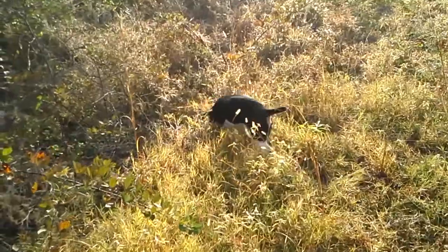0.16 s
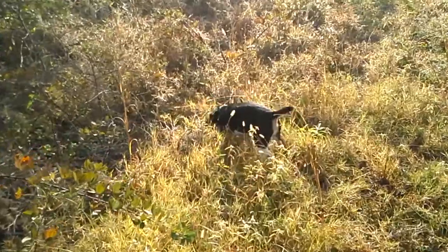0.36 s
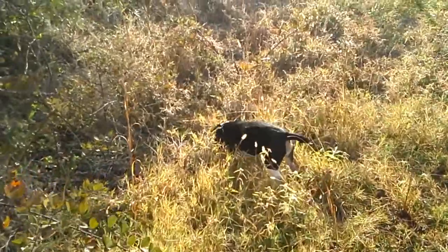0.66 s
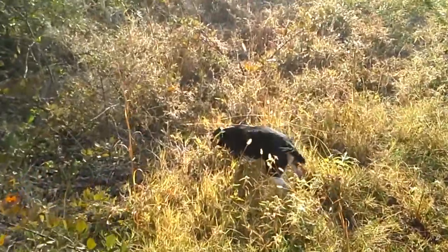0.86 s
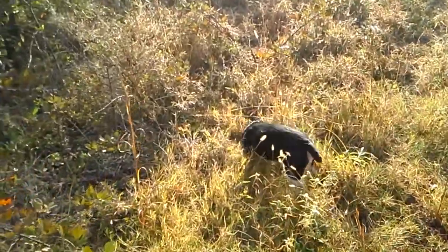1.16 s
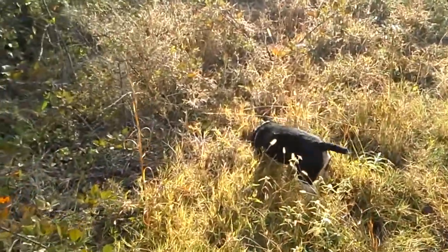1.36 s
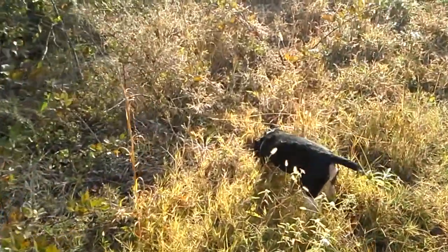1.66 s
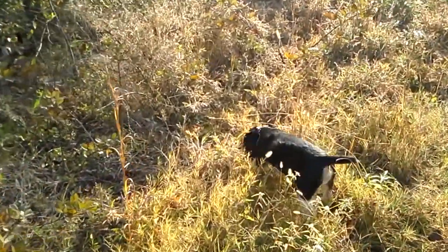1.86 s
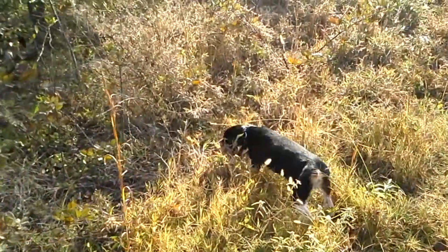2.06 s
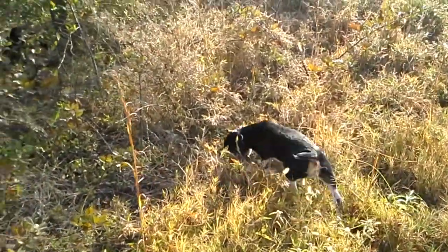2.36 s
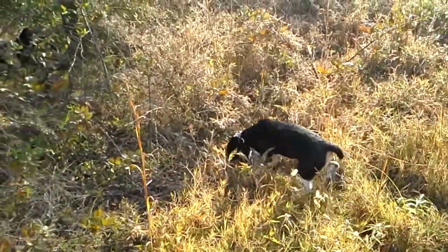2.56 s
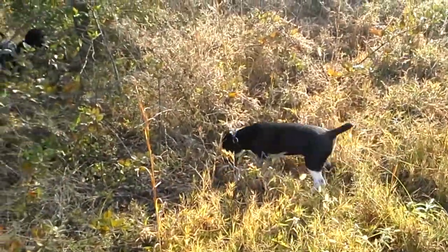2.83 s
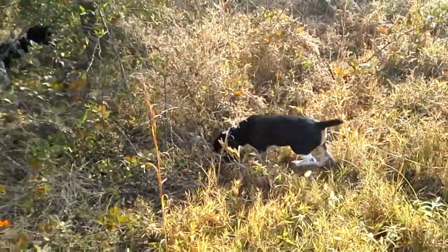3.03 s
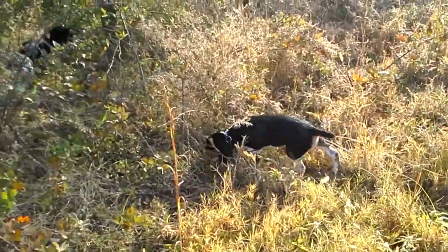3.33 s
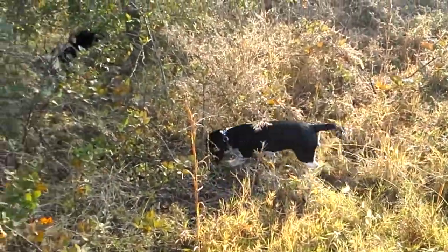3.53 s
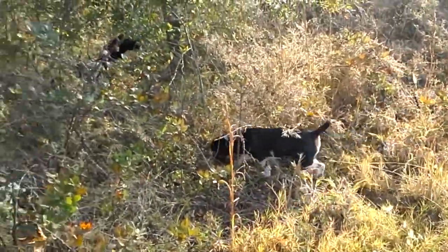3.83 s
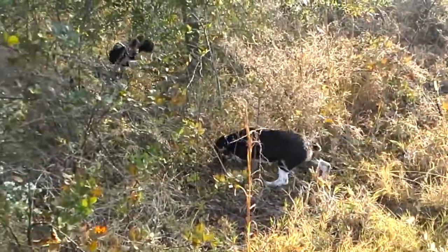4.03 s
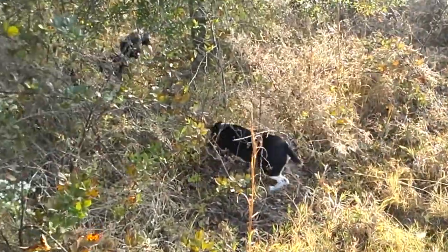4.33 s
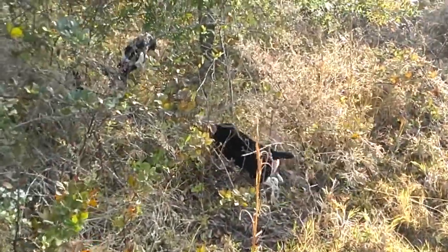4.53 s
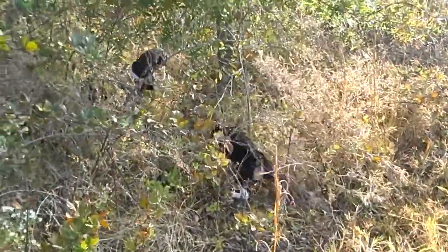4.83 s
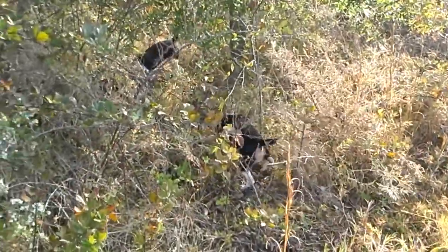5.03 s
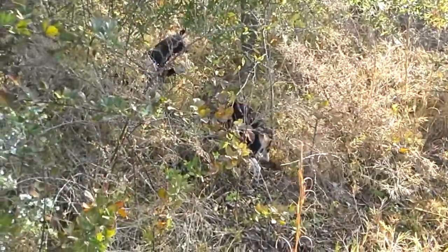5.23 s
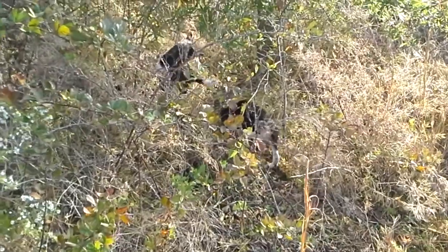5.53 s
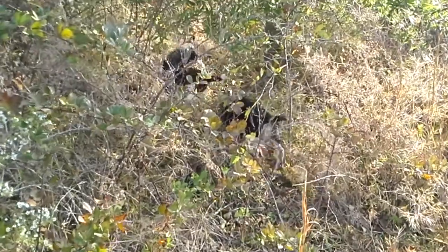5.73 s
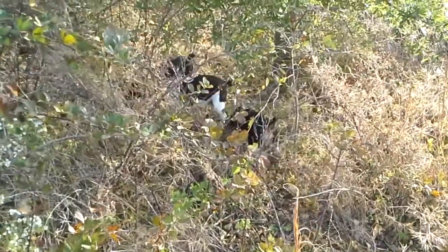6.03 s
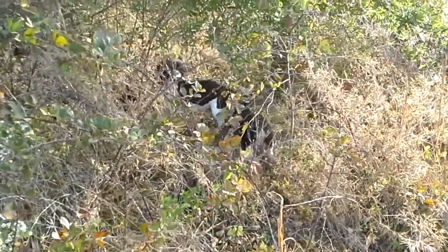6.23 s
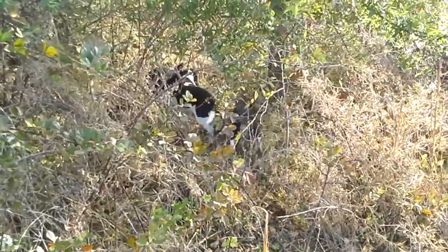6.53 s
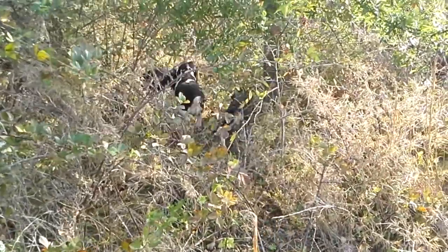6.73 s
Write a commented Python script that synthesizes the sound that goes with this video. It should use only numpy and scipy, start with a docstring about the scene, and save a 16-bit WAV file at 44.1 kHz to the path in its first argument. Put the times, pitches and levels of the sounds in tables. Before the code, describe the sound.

A rough, raspy bay repeats while a second dog answers with short high yelps; dry brush crackles, collar tags clink, trees echo faintly.

```python
"""One hound bays hoarsely: fold pulses turn rough, a steadier second tone chops them, and resonances ring.
Another hound yelps in high arching calls, sums of harmonics that crack into doubled periods or noisy barks.
Brush rustles, crackles and snaps as filtered noise; collar tags ring as decaying sines.
Low lumpy noise makes a gust, puffs on the microphone and one thump under a loud yelp as the input lurches.
Trees echo the calls and the input flattens the loudest peaks."""
import sys
import numpy as np
from scipy import signal
from scipy.fft import rfft, irfft, next_fast_len
from scipy.io import wavfile
from scipy.ndimage import uniform_filter1d, map_coordinates

SR = 44100
rng = np.random.default_rng(int(sys.argv[2]) if len(sys.argv) > 2 else 0)


def wav_out(sig):
    """Save sig, one row per channel (or a flat mono array), as 16-bit PCM at SR to the path in sys.argv[1]."""
    wavfile.write(sys.argv[1], SR, np.round(np.clip(np.atleast_2d(sig).T, -1, 1) * 32767).astype(np.int16))


N = 303835
TIME = np.arange(N) / SR
ONSET_POWER = 0.95  # shapes the soft start of the folds
CRACK_S = 0.006  # time a register crack takes


def amp(db):
    """Amplitude of a level in dB."""
    return 10 ** (np.asarray(db) / 20)


def unit(x):
    """x at rms 1."""
    return x / np.sqrt(np.mean(x ** 2) + 1e-20)


def even(x, size=900):
    """x held near rms 1 from moment to moment; size in samples."""
    power = uniform_filter1d(uniform_filter1d(x * x, size), size // 2)
    return x / np.sqrt(np.abs(power) + 1e-12)


def along(points, hz):
    """(Hz, value) points interpolated on a log frequency axis."""
    f, v = np.transpose(points)
    return np.interp(np.log(hz + 1), np.log(f + 1), v)


def wobble(n, rate):
    """A smooth random curve, rate knots a second."""
    knots = rng.standard_normal(8192)
    return map_coordinates(knots, [np.arange(n) * rate / SR], mode="wrap")


def filtered(x, response):
    """x times a complex response of frequency."""
    m = next_fast_len(len(x) + 4096)
    return irfft(rfft(x, m) * response(np.fft.rfftfreq(m, 1 / SR)), m)[:len(x)]


def resonance(f, hz, width):
    """A steep causal resonance: one pole pair applied twice."""
    return (1j * f * width / (hz * hz - f * f + 1j * f * width)) ** 2


def noise(spectrum):
    """Coloured noise of rms 1."""
    return unit(filtered(rng.standard_normal(N), lambda f: amp(along(spectrum, f))))


def cycles(hz):
    """Phase of an oscillator."""
    return 2 * np.pi * np.cumsum(hz) / SR


def span(start, length):
    """The samples of a call and the time since its start."""
    at = np.flatnonzero((TIME >= start) & (TIME <= start + length))
    return at, TIME[at] - start


def ramp(t, length):
    """A smooth step from 0 to 1 that takes length seconds."""
    return np.sin(np.pi / 2 * np.clip(t / length, 0, 1)) ** 2


def passband(f, notch_hz=950, notch_depth=0.057, notch_width_hz=110, top_hz=2850):
    """The throat passes a steep-sided band, with an antiresonance above its lowest peak."""
    notch = 1 - notch_depth / (1 + ((f - notch_hz) / notch_width_hz) ** 2)
    return notch / (1 + (f / top_hz) ** 24) / (1 + (430 / (f + 1)) ** 8)


def sliding(source, stretch, response, count=7):
    """Resonances that slide by the factor stretch: a cross-fade between fixed shapes, held at rms 1."""
    sizes = np.linspace(stretch.min() * .99, stretch.max() * 1.01, count)
    total = 0
    for size, share in zip(sizes, np.eye(count)):
        ring = filtered(source, lambda f: response(f / size))
        total = total + np.interp(stretch, sizes, share) * ring
    return even(total)


def bay(beat, trim_db=-1.5, jitter=.072, shimmer=0.63, coupling=0.674, muzzle_db=-17,
        jaw_rise=0.058, jaw_waver=0.036, flutter_db=3.0, count=18):
    """Fold pulses turn chaotic, are chopped by the second tone and ring the throat's resonances."""
    # bays: start_s, length_s, attack_s, release_s, level_db (before trim), push_db, first_hz, top_hz (before sag),
    # clean_s, roughness (clipped to 1), throat_db, mouth_db, lips_db, rasp_db (relative), widest_after_s,
    # main_resonance_wide_hz, main_resonance_end_hz
    bay_calls = [(0.455, 0.057, 0.015, 0.0096, -32.5, 1, 568.5, 574, .040, .3, -2, -4, -18, -2, .02, 1750, 1750),
                 (0.484, .160, 0.048, .035, -11.5, 12.5, 569.6, 667.3, 0.0055, 1, -13, -15, -10.5, -3.5, 0.079, 1780, 1750),
                 (0.785, 0.41, 0.04, 0.057, -12.5, 12, 564.6, 688.6, 0.028, 0.9, -6.5, -6, -15, -1.5, 0.04, 1850, 1674),
                 (1.504, 0.25, 0.022, 0.12, -8.5, 1.5, 575, 641.7, 0.012, 1.08, -4.5, -2.5, -17, -7.5, 0.075, 1964, 1940),
                 (2.019, .494, 0.022, 0.045, -11, 4.5, 642.8, 703, .001, .9, -8.5, -5.5, -14, 3.5, .13, 2190, 1750),
                 (2.692, 0.44, 0.014, 0.064, -10, 8.5, 566, 629.6, 0.011, 1.01, -13.5, -6, -27, -1, 0.026, 1920, 1730),
                 (3.274, 0.407, 0.02, 0.024, -10.5, 10.5, 515.4, 607.5, 0.0238, 0.89, -11.5, -2, -13.5, 2, 0.041, 1850, 1628),
                 (3.848, 0.18, 0.055, 0.061, -7.5, 5.5, 506.5, 559.8, 0.047, 0.9, -14, -10, -31, 1, 0.086, 1654, 1610),
                 (4.91, 0.17, 0.032, 0.062, -9, 7, 549, 653, 0.0019, 1.07, -10, -14, -14, -2, 0.046, 1820, 1740),
                 (5.389, .357, 0.02, 0.041, -11, 6, 561.4, 683.3, 0.017, 1.05, -9.5, -11, -7, -2.5, 0.12, 1970, 1830),
                 (6.742, 0.15, 0.046, 0.12, -23.5, -9, 502, 549, 0.0613, 0.36, 13, 26, -3, -3, 0.045, 1730, 1600)]
    # muzzle resonances: center_hz (before sliding), width_hz, relative_db
    muzzle_modes = [(3340, 180, -7), (5020, 420, -2), (5810, 106, 8), (6396, 200, 4), (7580, 375, 0.5),
                    (8750, 1400, -15.5)]
    # throat resonances: center_hz, width_hz
    throat_mode, mouth_mode, main_mode, lips_mode = (651.5, 240), (1305, 344), (1980, 372), (2423, 290)
    push_at_s, push_fade_s = 0.051, 0.042
    squeeze_db, squeeze_lead_s, squeeze_half_s = 1, 0.12, 0.022  # last squeeze of air, lead counted from the end
    pitch_rise_s, pitch_sag_s, pitch_sag = .055, .09, .11  # sag is a share of the pitch
    breakup_s, clean_rough = 0.0206, 0.053
    jaw_swing, jaw_close_s = 0.051, 0.1  # main resonance starts this share low
    shut_s, shut_throat_db = 0.029, 17.5  # a nearly shut muzzle favours the throat
    clean_mouth_db, mouth_db_per_hz = -21, 0.0066  # a clean voice hardly rings the mouth
    pitch_wander, jaw_wander = .02, 0.035

    def muzzle(f):
        return sum(amp(d) * resonance(f, c, w) for c, w, d in muzzle_modes)

    out = np.zeros(N)
    for (start, length, attack, release, db, push_db, first_hz, top_hz, clean_s, hoarse,
         throat_db, mouth_db, lips_db, rasp_db, widest_s, wide_hz, closed_hz) in bay_calls:
        at, t = span(start, length)
        n, left = len(at), length - t

        push = ramp(t, push_at_s) * np.exp(-np.maximum(t - push_at_s, 0) / push_fade_s)
        squeeze = np.exp(-((left - squeeze_lead_s) / squeeze_half_s) ** 2) * (1 - push)
        force = ramp(t, attack) ** ONSET_POWER * ramp(left, release)
        force = force * amp(db + trim_db + push_db * push + squeeze_db * squeeze)

        hz = top_hz + (first_hz - top_hz) * np.exp(-(t / pitch_rise_s) ** 2)
        hz = hz * (1 - pitch_sag * np.exp(-left / pitch_sag_s))
        broken = ramp(t - clean_s, breakup_s)
        rough = np.clip(clean_rough + (hoarse - clean_rough) * broken, 0, 1)

        jaw_hz = wide_hz + (closed_hz - wide_hz) * ramp(t - widest_s, jaw_close_s)
        jaw_hz = jaw_hz * (1 - jaw_swing * (1 - ramp(t, widest_s)))
        shut = np.exp(-np.minimum(t, left) / shut_s)
        mouth_db = mouth_db + mouth_db_per_hz * (jaw_hz - closed_hz) * broken + clean_mouth_db * (1 - broken)

        unsteady = 1 + jitter * rough * wobble(n, 420) + pitch_wander * rough * wobble(n, 17)
        phase = cycles(hz * unsteady)
        pulses = unit(sum(np.cos(k * phase) for k in range(1, count)))
        pulses = pulses * (1 + shimmer * rough * wobble(n, 500))
        turbulence = rough * (1 + np.cos(phase)) * rng.standard_normal(n)
        source = (pulses + turbulence) * (1 + coupling * beat[at])

        low = filtered(source, passband)
        stretch = jaw_hz * (1 + jaw_wander * wobble(n, 15.2)) / main_mode[0]
        voice = sliding(low, stretch, lambda f: resonance(f, *main_mode))
        throat_db = throat_db + shut_throat_db * shut
        for mode, mode_db in ((throat_mode, throat_db), (mouth_mode, mouth_db), (lips_mode, lips_db)):
            # chaos shifts energy between the resonances
            level = amp(mode_db + flutter_db * rough * wobble(n, 43.2))
            voice = voice + level * even(filtered(low, lambda f: resonance(f, *mode)))

        rasp = sliding(source, 1 + jaw_rise * t / length + jaw_waver * wobble(n, 22.28), muzzle)
        rasp_level = amp(muzzle_db + rasp_db + flutter_db * wobble(n, 31.4))
        out[at] += force * (even(voice, size=400) + rasp_level * rasp)
    return out


def drone(jitter=0.01, wander=.02, shimmer_db=2, swell_db=1.5, fade_s=0.021, lead_rad=2.31):
    """The second tone of the long bays, an arch of pitch: its sound, and its beat that modulates the folds."""
    # second tones: start_s, length_s, end_hz, middle_hz, first_level_db, last_level_db
    drone_calls = [(0.843, .31, 434.2, 468.6, -13, -24.5), (2.059, .42, 429, 437.8, -19.5, -15),
                   (2.734, 0.34, 431.8, 439.3, -18, -18.5), (3.327, .345, 429.9, 430, -19, -21),
                   (5.456, 0.23, 428.2, 437.8, -21.5, -15)]
    # harmonics 1 to 6: relative_db
    drone_harmonics = [-21.5, -11.5, -2, 0, -7.5, -35]
    sound, beat = np.zeros(N), np.zeros(N)
    for start, length, end_hz, mid_hz, first_db, last_db in drone_calls:
        at, t = span(start, length)
        n = len(at)
        db = first_db + (last_db - first_db) * t / length
        fade = ramp(t, fade_s) * ramp(length - t, fade_s)
        hz = end_hz + (mid_hz - end_hz) * np.sin(np.pi * t / length) ** 2
        phase = cycles(hz * (1 + wander * wobble(n, 20) + jitter * wobble(n, 153.6)))
        tone = np.zeros(n)
        for k, harmonic_db in enumerate(drone_harmonics, 1):
            tone += amp(harmonic_db + shimmer_db * wobble(n, 49.0)) * np.cos(k * phase)
        sound[at] = np.sqrt(2) * fade * amp(db + swell_db * wobble(n, 17.3)) * tone
        beat[at] = fade * np.cos(phase + lead_rad)  # the folds lead by the throat's delay
    return sound, beat


def yelp(jitter=0.08, tremor=0.0045, doubling_db=-2, drop_rough=0.22, drop_doubling=0.53, count=22):
    """A nearly pure tone that glides, holds and drops; pushed hard, it cracks an octave down or into a bark."""
    # yelps: start_s, length_s, attack_s, level_db, overtones_db, first_hz, top_after_s, top_hz,
    # before_drop_hz, last_hz (pitches before the crack factor)
    yelp_calls = [(0.197, .140, 0.041, -8, -11.5, 711, 0.045, 836, 799, 690),
                  (1.154, 0.13, 0.044, -9, -8, 1308, 0.049, 1502, 1486, 890),
                  (1.589, 0.11, 0.016, -10.5, -8, 1424, 0.027, 1489, 1504, 1130),
                  (1.892, 0.13, 0.013, -5, -3.5, 1082, 0.015, 939, 851, 760),
                  (4.25, 0.13, 0.064, -11.5, -7.5, 1096, 0.073, 1404, 1327, 1100),
                  (4.6, .124, 0.043, -10, -3, 1146, 0.067, 1470, 1454, 665),
                  (5.085, 0.043, 0.033, -20.5, -9.5, 1560, 0.0177, 1550, 1550, 1420),
                  (5.111, 0.15, 0.018, -8, -11.5, 1187, 0.0356, 1166, 1148, 890),
                  (5.907, 0.068, 0.037, -11.5, -3, 733, 0.037, 774, 772.5, 646),
                  (6.473, 0.1, 0.052, -8, -5, 1123, 0.056, 1504, 1492, 757)]
    # throat colour: freq_hz, relative_db
    yelp_colour = [(200, -29), (450, -34), (720, 9.5), (1000, 9), (1400, 0.5), (2000, 3), (2500, -4),
                   (3000, -4), (3600, -7), (4500, -27.5), (7500, -15.5), (11000, -33.5), (16000, -45.5)]
    # resonance that the open mouth adds: center_hz, half_width_hz
    open_hz, open_width_hz = (1820, 550)
    drop_s, release_s, sag_db_per_s = .03, 0.031, 45
    out = np.zeros(N)
    for start, length, attack, db, slope_db, first_hz, top_s, top_hz, late_hz, last_hz in yelp_calls:
        at, t = span(start, length)
        n = len(at)
        factor, doubling, rough, crack_db, mouth_db = register(start, t)
        climb = np.sin(np.pi / 2 * np.clip(t / top_s, 0, 1))
        hold = ramp(t - top_s, max(length - drop_s - top_s, CRACK_S))
        drop = np.clip(1 - (length - t) / drop_s, 0, 1) ** 1.4
        hz = first_hz + (top_hz - first_hz) * climb + (late_hz - top_hz) * hold + (last_hz - late_hz) * drop
        force = ramp(t, attack) ** ONSET_POWER * np.sqrt(ramp(length - t, release_s))
        force = force * amp(db + crack_db - sag_db_per_s * (t - attack))

        # the slackening folds lose their grip
        rough = np.clip(rough + drop_rough * drop, 0, 1)
        doubling = doubling + drop_doubling * drop
        hz = factor * hz * (1 + jitter * rough * wobble(n, 478) + tremor * wobble(n, 134.0))
        # slight phase scatter blurs the high overtones but leaves the fundamental sharp
        phase = cycles(hz) + .12 * wobble(n, 700)

        tone = np.zeros(n)
        for half in range(1, count):
            k = half / 2
            # alternating cycles add lines halfway between the harmonics
            size = doubling * amp(doubling_db) if half % 2 else 1
            overtone_db = (slope_db * (1 - rough) + 5.5 * wobble(n, 87)) * (k > 1)
            open_db = mouth_db * np.exp(-((k * hz - open_hz) / open_width_hz) ** 2)
            tone += size * amp(along(yelp_colour, k * hz) + overtone_db + open_db) * np.sin(k * phase)

        breath = (1 + np.cos(phase)) * rng.standard_normal(n)
        bark = unit(filtered(breath, lambda f: resonance(f, 1650, 790) * passband(f)))
        out[at] += force * even(even(tone, size=400) + rough * bark, size=400)
    return out


def register(start, t, clean_rough=0.027):
    """Pitch factor, doubling, roughness, level and mouth dB through a yelp: nearly clean until it cracks."""
    # cracks: start_s, pitch_factor, period_doubling (0-1), roughness (0-1), level_change_db, mouth_resonance_db
    crack_rows = [(0.220, 0.98, 0.9, 0.04, -1, 0.5), (0.249, 0.88, 0.19, 0.6, 1, 16),
                  (1.214, 0.93, 0.87, 0.12, 3, 11), (1.632, .89, 1, 0.12, 7, 19),
                  (1.921, 1.017, 1, 0.17, 2.5, 11), (1.956, .93, 1, 0.58, -2.5, 9.5),
                  (5.113, 1, 0.13, 0.31, 5, 6), (5.148, 1.15, 0.05, 0.15, 2, -9),
                  (5.182, 1.13, .06, .04, 0.5, -9), (5.936, 1.04, 0.93, 0.23, 4.5, 4)]
    state = np.outer([1, 0, clean_rough, 0, 0], np.ones(len(t)))
    for s, *new in crack_rows:
        if start <= s <= start + t[-1]:
            state = state + (np.array(new)[:, None] - state) * ramp(start + t - s, CRACK_S)
    return state


def brush(trim_db=-1, crackle_db=-7, spike_db=6, twig_db=-4, snap_t60_s=0.037):
    """Dry grass hisses and crackles around the dogs' legs; now and then a twig snaps."""
    # rustle as the dogs push through: time_s, level_db (before trim)
    rustle_points = [(0.05, -38.5), (0.37, -33), (0.72, -42), (1.42, -38.5), (1.82, -44), (2.6, -41),
                     (3.2, -41.5), (3.78, -38), (4.08, -40.5), (4.45, -37), (4.85, -40.5), (5.35, -35),
                     (6.06, -34.5), (6.3, -44), (6.62, -37), (6.87, -40.5)]
    # rustle spectrum: freq_hz, relative_db_per_hz
    leaf_spectrum = [(180, -55), (300, -5), (511, -1.5), (614, 3.5), (856, 3.5), (1140, -1.5), (1690, 0.5),
                     (2880, -6), (3190, -3.5), (4090, -6), (7690, 2.5), (10200, -10), (16000, -11)]
    # snaps: start_s, level_db (before twig_db)
    twig_snaps = [(0.9836, -42), (4.832, -36.5), (5.3817, -36), (6.2495, -25.5), (6.3817, -27.5),
                  (6.4249, -27.5)]
    snap_spectrum = [(600, 5), (2000, 10), (4200, 18), (9000, 13.5), (16000, -33)]  # freq_hz, relative_db

    db = np.interp(TIME, *np.transpose(rustle_points))
    stems = rng.standard_normal(N) * (rng.random(N) < 600 / SR)  # about 600 a second
    stems = stems * amp(spike_db * rng.standard_normal(N).clip(-2, 2) + 4.8 * wobble(N, 18))
    crackle = unit(filtered(stems, lambda f: resonance(f, 5100, 5900)))
    sway = amp(1.4 * wobble(N, 14))
    rustle = amp(db + trim_db) * (sway * noise(leaf_spectrum) + amp(crackle_db) * crackle)

    snaps = np.zeros(N)
    for s, snap_db in twig_snaps:
        snaps += amp(snap_db + twig_db - 60 * np.abs(TIME - s) / snap_t60_s) * (TIME >= s)
    return rustle + snaps * noise(snap_spectrum)


def tags(softness_db=26):
    """Two metal tags ring as decaying modes; a softer touch weakens the higher ones."""
    # strikes: start_s, brass_db, steel_db, hardness (0-1)
    tag_strikes = [(.64, -51, -60, 0.1), (1.775, -47, -60, 0), (3.684, -25, -15, 0.07),
                   (3.744, -49, -47.5, .2), (3.792, -31, -42, 0), (5.722, -20, -47, 0.4),
                   (5.758, -23, -64, 0), (5.798, -24.5, -60, 0)]
    # brass tag modes: freq_hz, relative_db, t60_s
    brass_modes = [(2090, -4, 0.15), (5430, 14, 0.12), (8380, 23, 0.12), (8840, 17, 0.12),
                   (13770, 19, 0.076), (14700, -5, 0.058)]
    # steel tag modes: freq_hz, relative_db, t60_s
    steel_modes = [(4770, 2, 0.21), (7540, 10, 0.21), (9100, 11.5, 0.1)]
    out, t = np.zeros(N + SR), np.arange(SR // 3) / SR
    for s, brass_db, steel_db, hard in tag_strikes:
        for modes, db in ((brass_modes, brass_db), (steel_modes, steel_db)):
            for hz, mode_db, t60 in modes:
                # softness_db is the loss per two octaves at hardness 0
                dull_db = softness_db * (1 - hard) * np.log2(hz / brass_modes[0][0]) / 2
                decay = amp(db + mode_db - dull_db - 60 * t / t60)
                out[round(s * SR):][:len(t)] += decay * np.sin(2 * np.pi * hz * t)
    return out[:N]


def low_bursts(buffet_trim_db=-1, lump_db=5, eddy_db=-37, burst_half_s=0.026):
    """Lumpy low noise: wind buffets the microphone, slow air rumbling deeper; one thump is the input's lurch."""
    # gust: time_s, strength_db
    gust_points = [(0, -40.5), (0.5, -41), (1.0, -39.5), (1.25, -26.5), (1.31, -20.5), (1.45, -25),
                   (1.76, -23), (1.87, -27), (2.05, -46)]
    # short bursts: peak_at_s, peak_strength_db; all are puffs on the microphone except the one at 5.14 s,
    # a low thump under the loud yelp as the overdriven input lurches
    burst_rows = [(0.75, -34.5), (2.62, -49), (5.14, -31), (5.83, -43), (6.02, -36.5)]
    # buffet spectrum: freq_hz, relative_db_per_hz
    buffet_spectrum = [(15, -72), (25, -52), (74, -6), (194, -1), (291, -3.5), (424, -12.5), (644, -27),
                       (700, -36), (910, -58), (1540, -120)]
    # deeper rumble of slow air: freq_hz, relative_db_per_hz
    eddy_spectrum = [(15, -17), (40, -2.5), (100, 6), (200, -11), (400, -28), (900, -80)]

    def lumpy(spectrum):
        return unit(noise(spectrum) * amp(lump_db * wobble(N, 40)))

    strength = amp(np.interp(TIME, *np.transpose(gust_points)))
    for s, db in burst_rows:
        strength = strength + amp(db) * np.exp(-((TIME - s) / burst_half_s) ** 2)
    buffet = amp(buffet_trim_db) * strength * lumpy(buffet_spectrum)
    return buffet + amp(eddy_db) * np.sqrt(strength) * lumpy(eddy_spectrum)


def woods(x, near_db=-21, near_t60_s=0.08, far_db=-31):
    """Nearby stems scatter the calls briefly; trunks echo and the trees behind return a faint tail."""
    # far decay: freq_hz, t60_s
    far_decay = [(200, 0.48), (1500, 0.64), (5000, 0.21), (12000, 0.97)]
    # single echoes: delay_s (after the 5 ms gap), level_db (before echo colour)
    trunk_echoes = [(.031, -49), (.052, -36), (.083, -39), (.135, -55.5)]
    # echo colour, leaves scatter treble best: freq_hz, gain_db
    echo_colour = [(300, -15), (850, 6), (1450, -5), (2200, 4), (4000, 16.5), (8000, 3), (15000, 22)]
    hz, t, z = signal.stft(rng.standard_normal(SR), SR, nperseg=256)
    far = signal.istft(z * amp(-60 * t / along(far_decay, hz)[:, None]), SR, nperseg=256)[1]
    near = rng.standard_normal(len(far)) * amp(-60 * np.arange(len(far)) / SR / near_t60_s)
    tail = amp(far_db) * far / np.linalg.norm(far) + amp(near_db) * near / np.linalg.norm(near)
    for delay, db in trunk_echoes:
        tail[round(delay * SR)] += amp(db)
    tail = np.pad(tail, (SR // 200, 0))  # 5 ms gap
    tail = filtered(tail, lambda f: amp(along(echo_colour, f)))
    return signal.fftconvolve(x, tail)[:N]


def hiss(level_db=-52):
    """The microphone's own steady high hiss."""
    return amp(level_db) * noise([(2000, -6), (9000, -36), (13000, 3), (15800, 17), (16500, -30)])


def scene(yelp_far_db=3):
    """Both hounds in the brush; the yelping one is deeper among the trees and echoes more."""
    second_tone, beat = drone()
    baying = second_tone + bay(beat)
    yelping = yelp()
    echoes = woods(baying + amp(yelp_far_db) * yelping)
    return (baying + yelping + echoes + tags() + brush() + low_bursts() + hiss())[None]


def record(dry, ceiling=0.71, knee=7, top_hz=15850):
    """The input stage flattens the loudest peaks; nothing passes above the band limit."""
    x = dry[0] / (1 + np.abs(dry[0] / ceiling) ** knee) ** (1 / knee)
    return filtered(x, lambda f: f < top_hz)[None]


dry = scene()
out = record(dry)
wav_out(out)
```